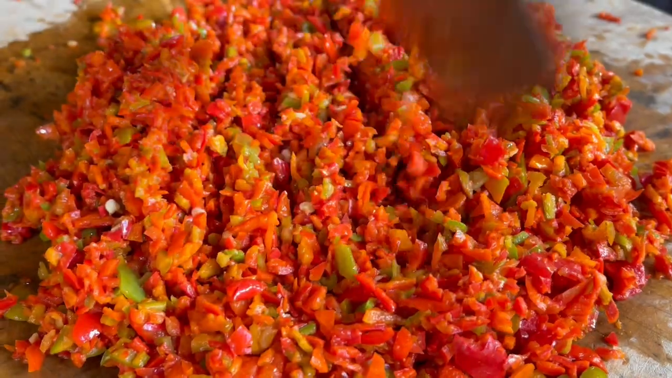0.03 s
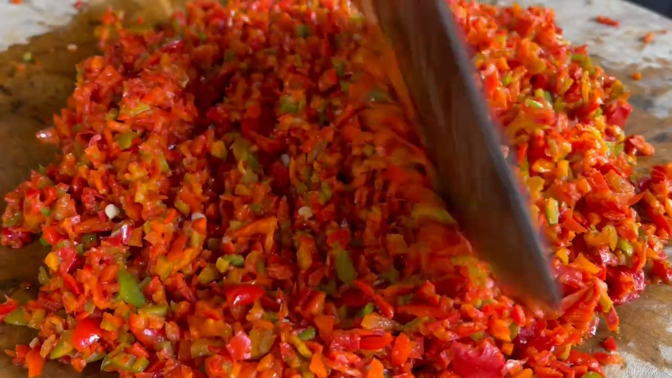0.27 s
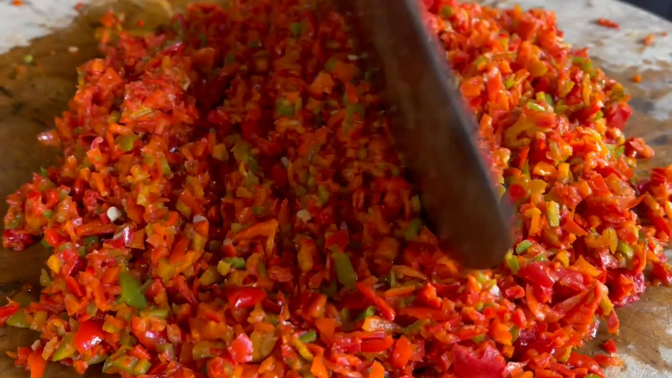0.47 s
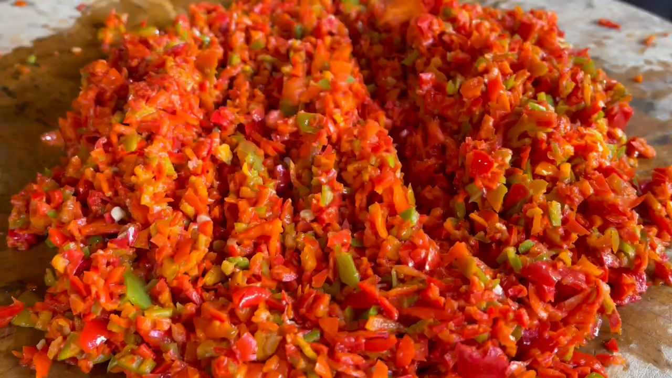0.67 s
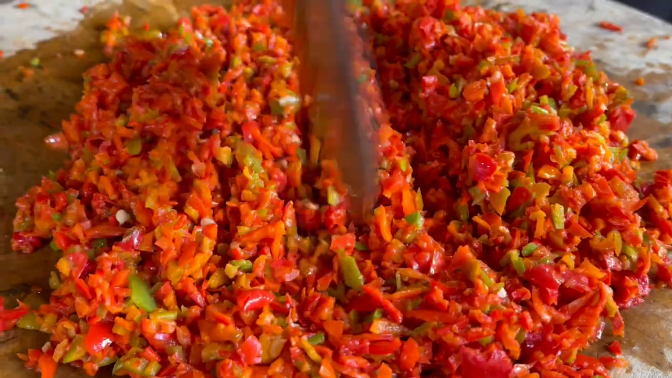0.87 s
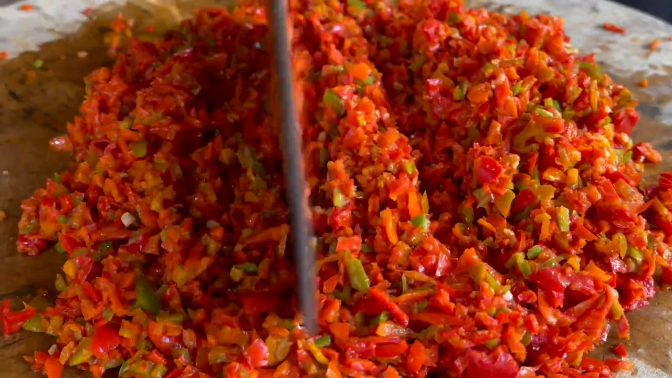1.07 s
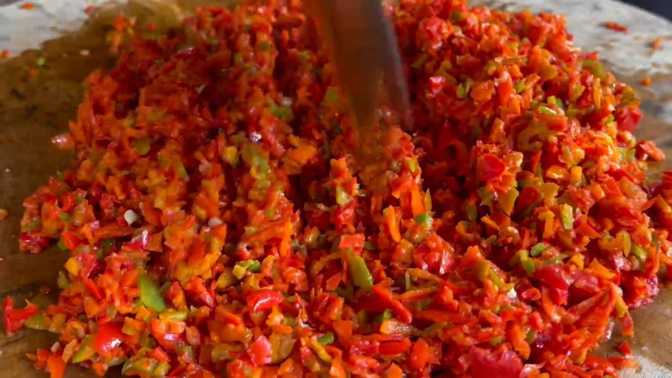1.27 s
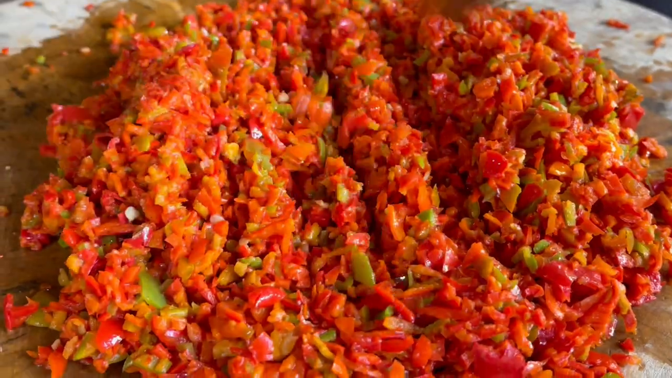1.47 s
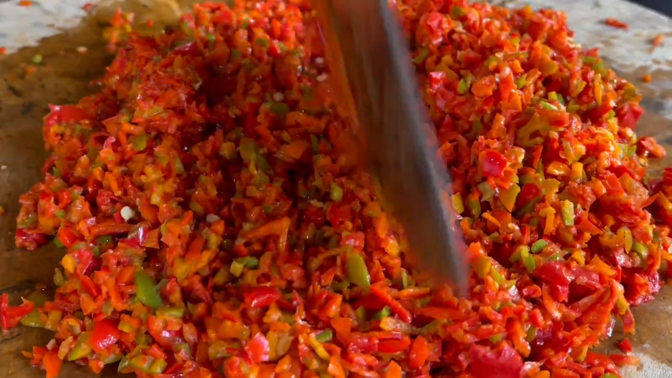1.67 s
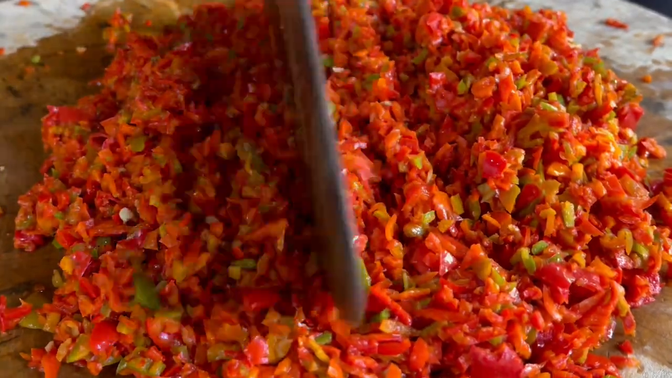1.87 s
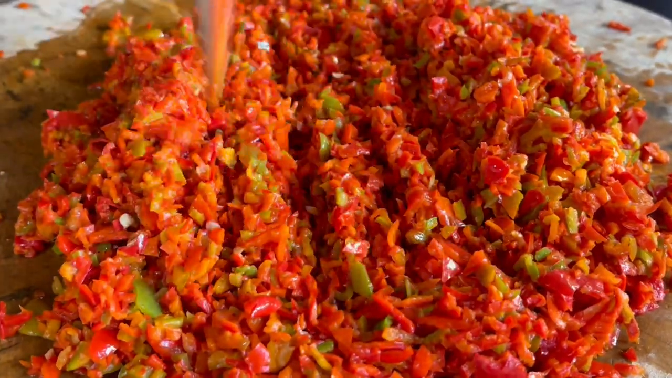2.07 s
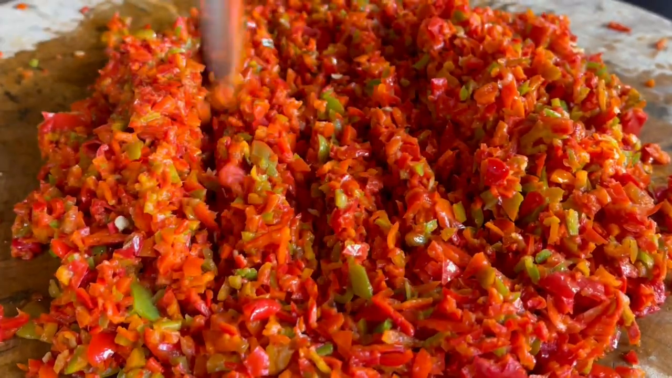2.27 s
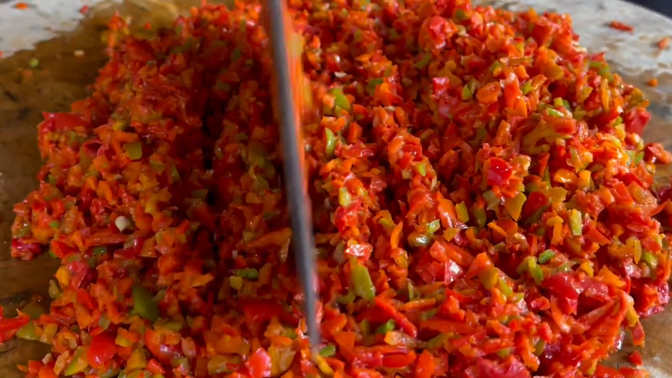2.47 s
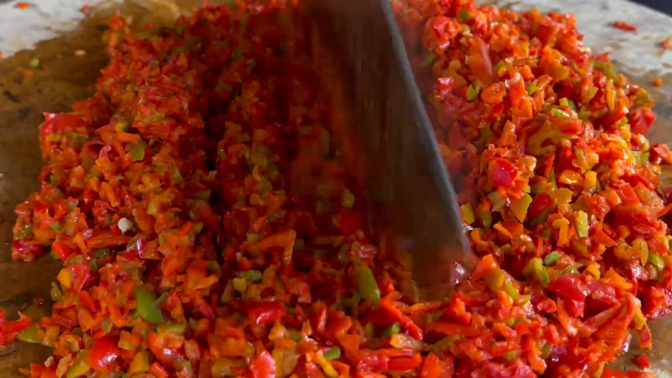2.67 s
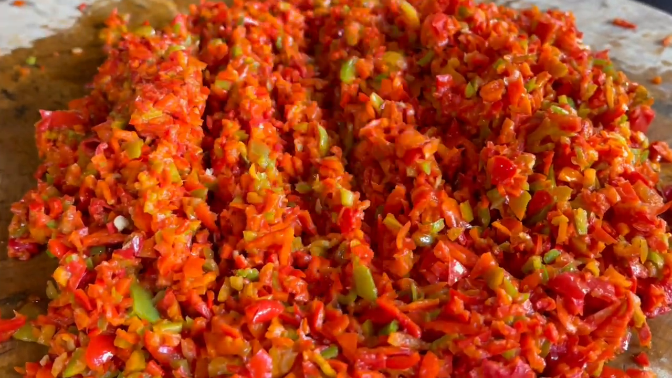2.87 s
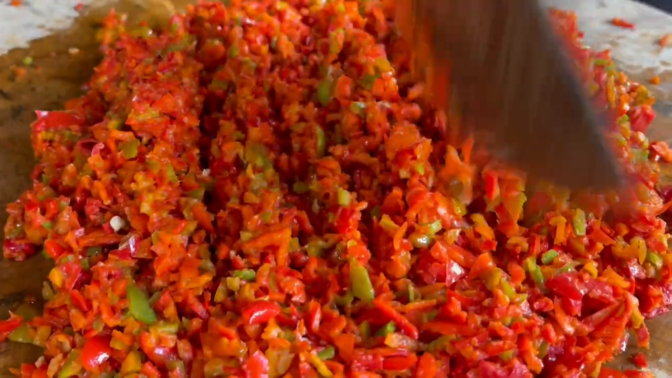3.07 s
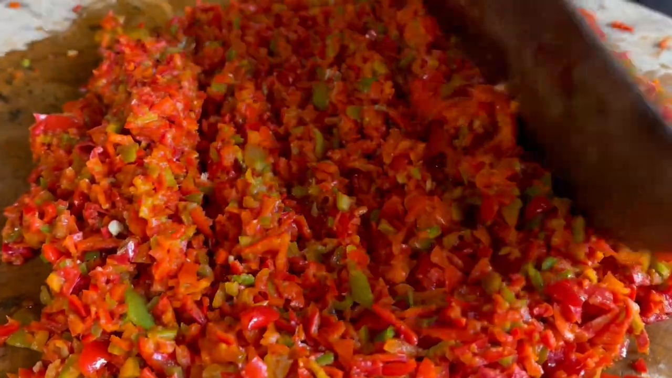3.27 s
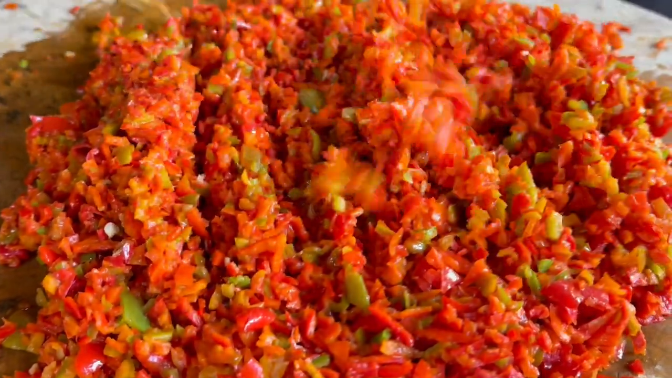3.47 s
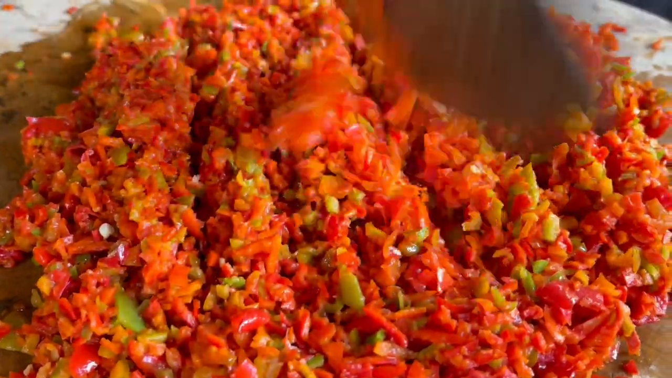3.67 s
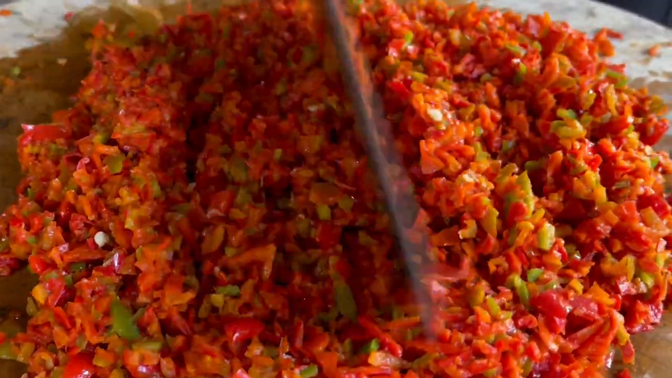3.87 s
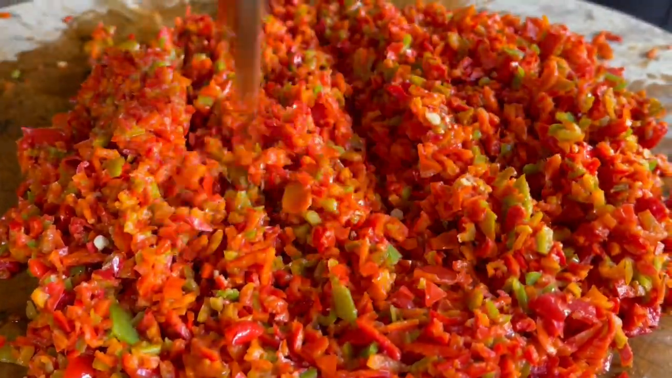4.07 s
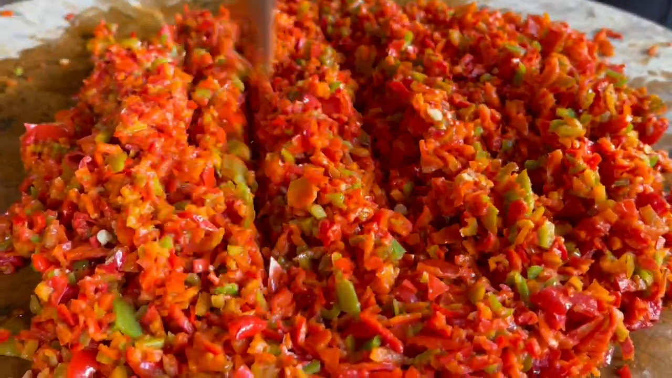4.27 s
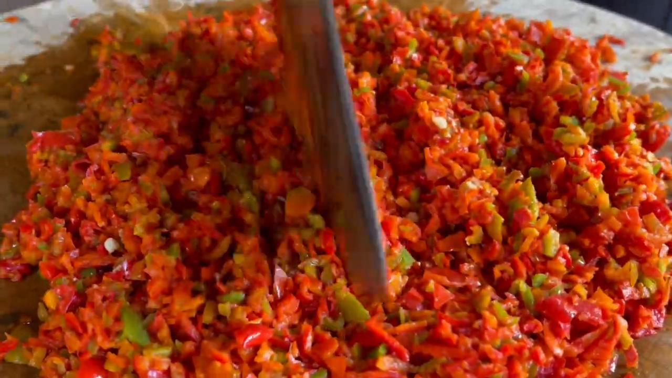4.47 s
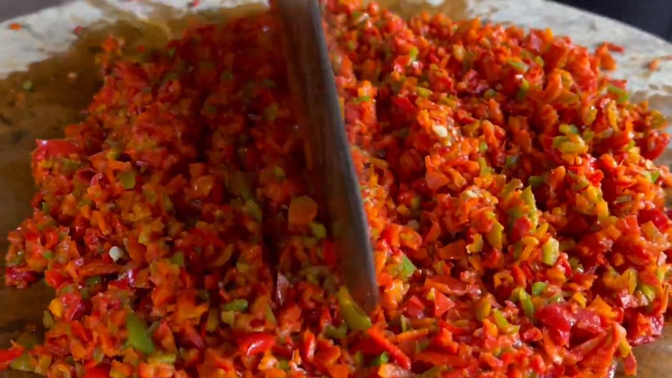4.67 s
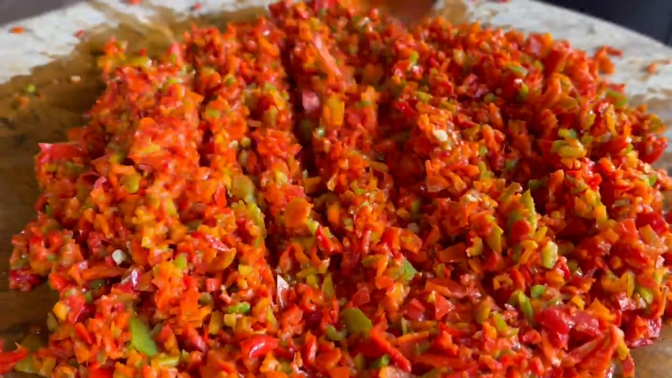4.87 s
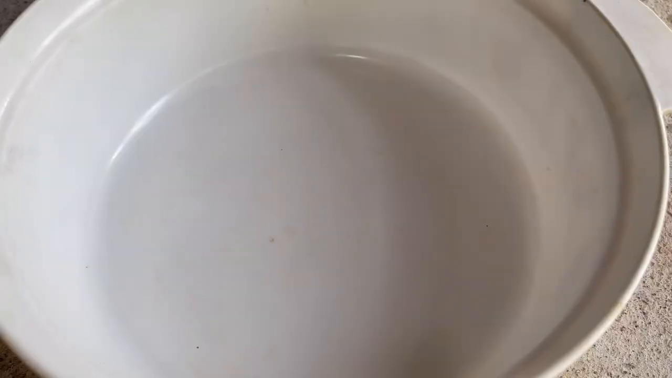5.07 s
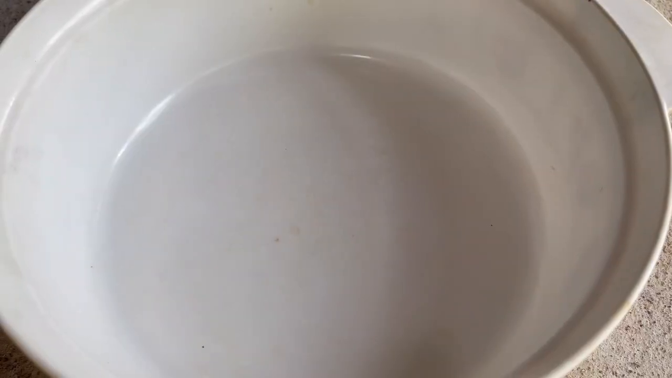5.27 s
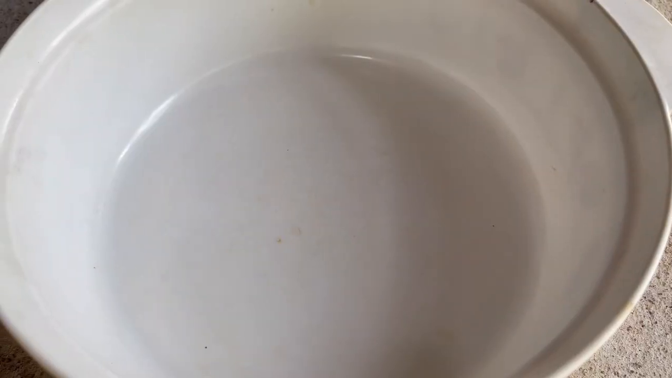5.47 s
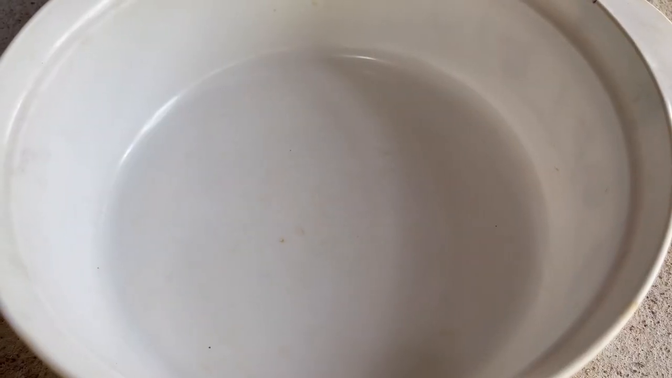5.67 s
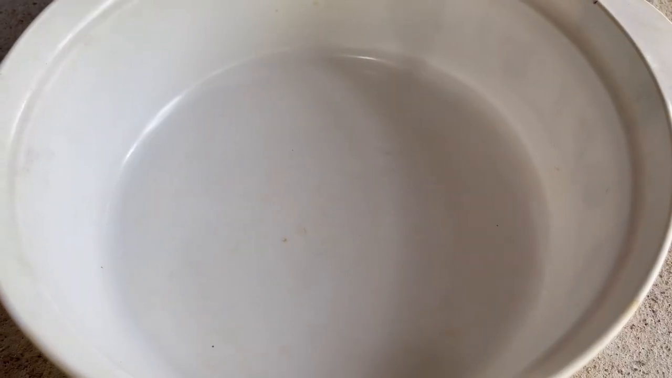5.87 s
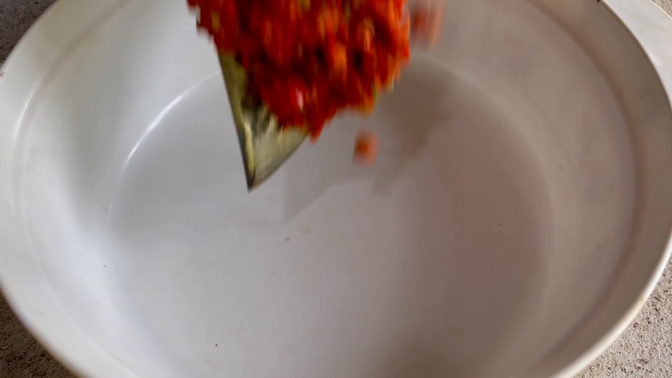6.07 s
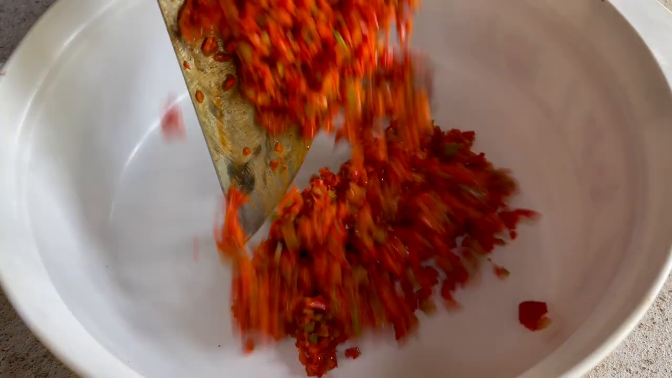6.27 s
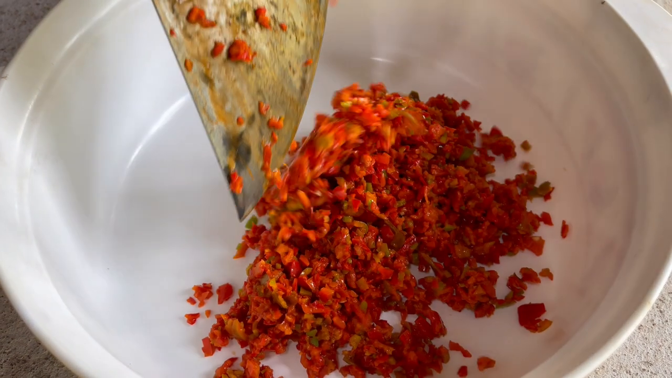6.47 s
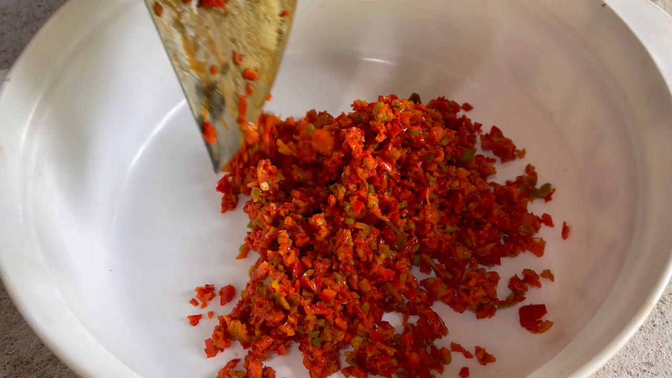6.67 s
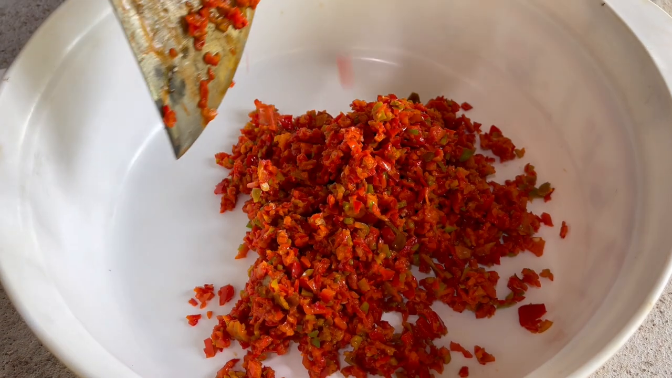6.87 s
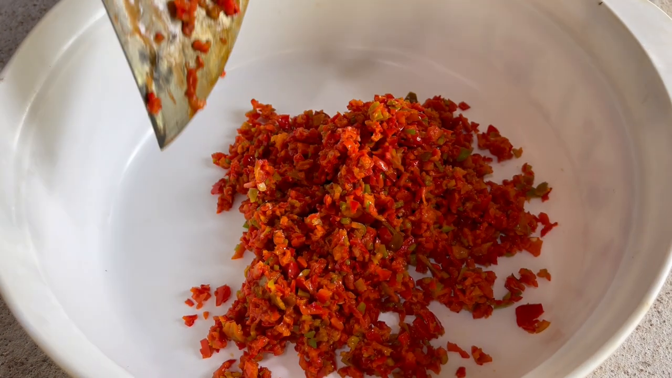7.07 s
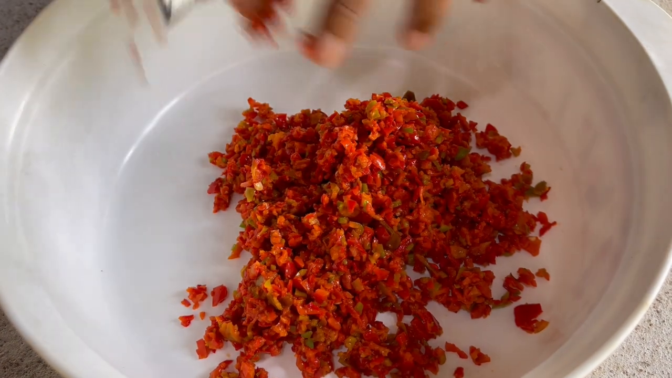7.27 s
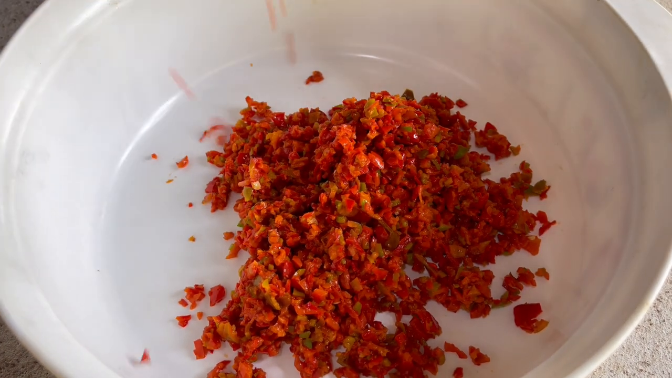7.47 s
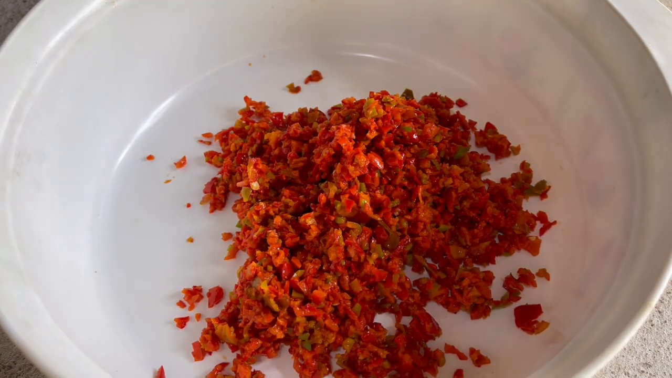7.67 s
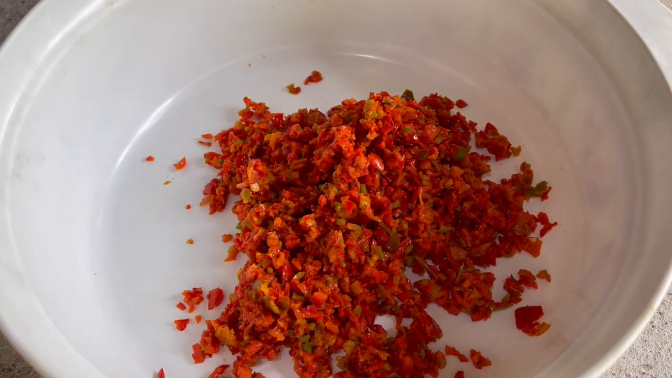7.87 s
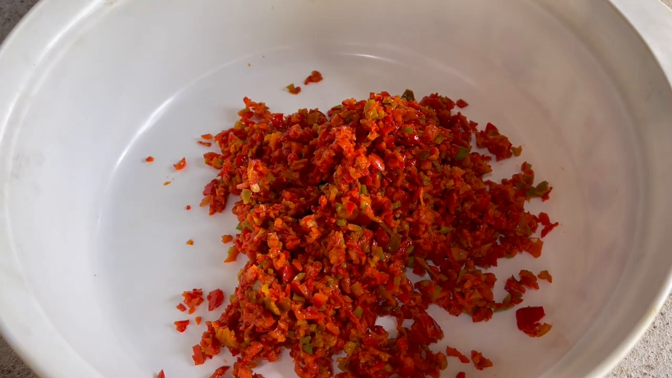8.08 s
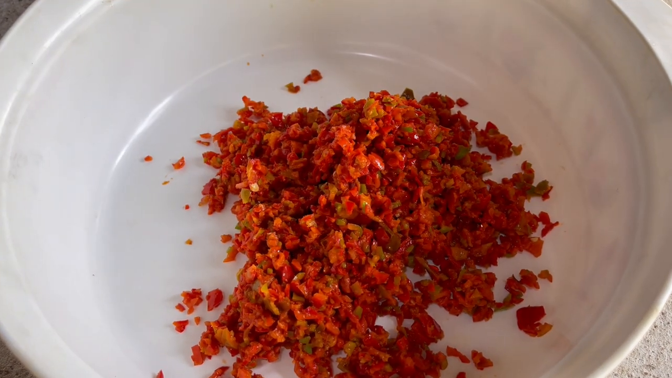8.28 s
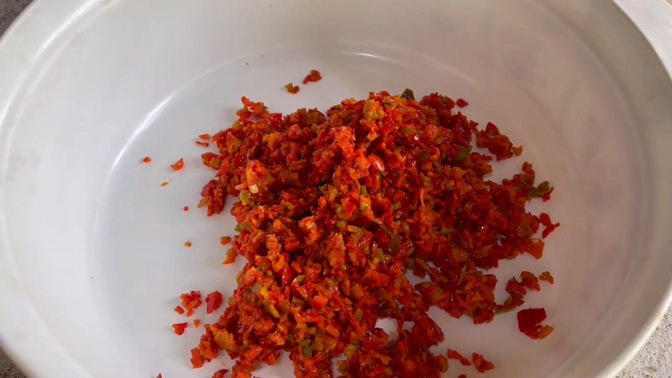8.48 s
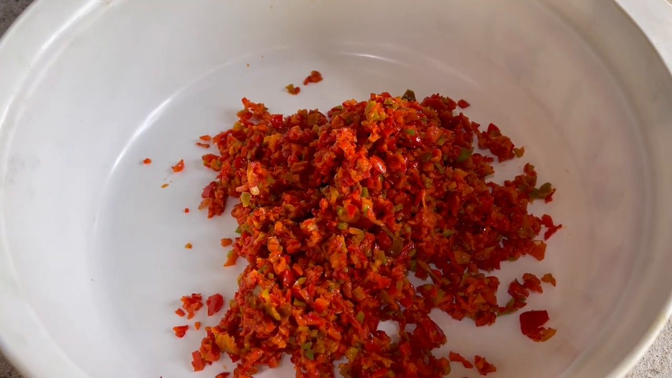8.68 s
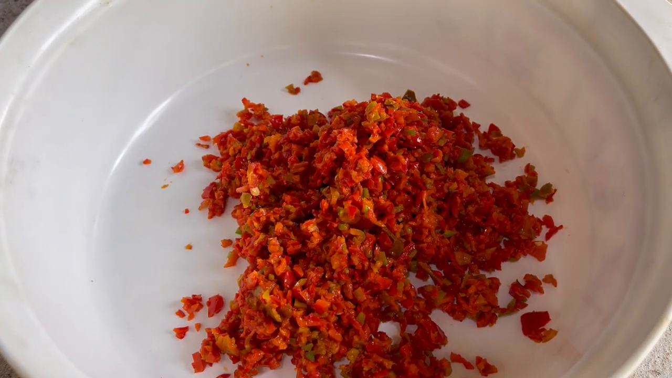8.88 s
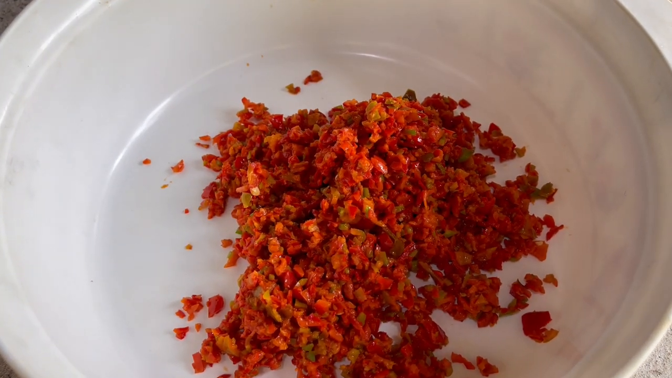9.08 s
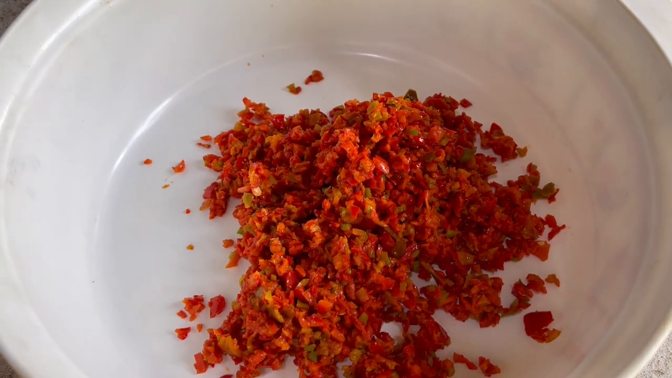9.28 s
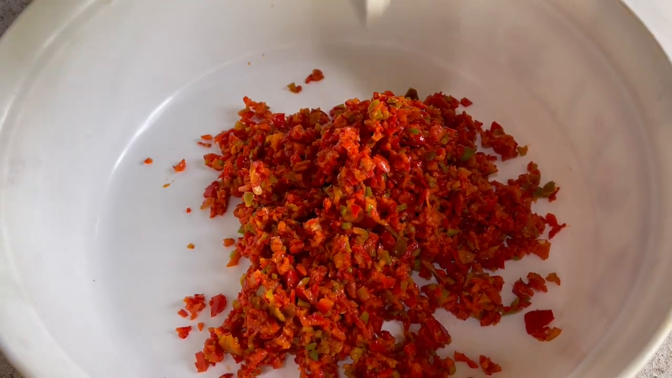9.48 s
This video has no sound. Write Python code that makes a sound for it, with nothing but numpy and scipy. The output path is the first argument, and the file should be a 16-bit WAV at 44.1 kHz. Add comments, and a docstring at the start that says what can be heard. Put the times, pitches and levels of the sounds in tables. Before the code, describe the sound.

A blade chops wet chilies steadily on a thick wooden block outdoors, then mince slides softly into a bowl and the blade scrapes wood, birds calling.

```python
"""Rhythmic chops on a thick wooden block outdoors: wet crunch of chilies, hollow knock, low thud of the stand.
After a brief dropout the mince slides off the blade into a bowl, a finger wipes the steel, the blade scrapes the block.
Birds call in the distance over a low rumble. Block, stand and steel are decaying sine modes; mince, rubbing and air
are coloured noise under envelopes; birds are wavering sine glides, with hiss on the chirps and diffuse echoes."""
import sys
import numpy as np
from scipy import signal
from scipy.fft import rfft, irfft, next_fast_len
from scipy.io import wavfile
from scipy.ndimage import uniform_filter1d

SR = 44100
rng = np.random.default_rng(int(sys.argv[2]) if len(sys.argv) > 2 else 0)


def digitize_waveform(pressure):
    """Quantize a signal to 16-bit integers and store it at the path in sys.argv[1].

    Rows of a 2-D input are taken as channels; values are limited to [-1, 1].
    """
    field = np.atleast_2d(pressure).T
    bounded = np.clip(field, -1, 1)
    quanta = np.round(bounded * 32767).astype(np.int16)
    wavfile.write(sys.argv[1], SR, quanta)


N = 420713
TIME = np.arange(N) / SR
DROPOUT_START_S, DROPOUT_END_S = 4.999, 5.042

# The chops. Each row: time in seconds, force in dB, pitch of the struck spot in Hz, then relative levels in dB of
# the block's clack, the edge tick, the crunch and the blade's ring.
CHOPS = [(-.045, -5, 780, -19, -35, -33, -48.5), (0.237, 1, 711, -16.5, -29.5, -30.5, -45),
         (0.513, -1, 624, -19, -30, -29, -45), (0.794, -1, 619, -16, -29, -33, -47.5),
         (1.066, -1, 676, -17, -32.5, -30, -47), (1.351, 0, 713, -17, -29, -35, -48),
         (1.633, -2, 961, -16, -29.5, -30.5, -54), (1.901, -1.5, 598, -16, -31.5, -33.5, -54.5),
         (2.171, -1.5, 592, -15.5, -33.5, -36.5, -66.5), (2.453, 0, 643, -15.5, -31.5, -37, -50),
         (2.731, -1.5, 611, -17, -29.5, -29.5, -43), (3.01, -1, 603, -18, -23.5, -33, -41.5),
         (3.308, -0.5, 724, -22, -26, -31, -40), (3.596, -0.5, 673, -17.5, -25.5, -33.5, -55.5),
         (3.882, -2, 711, -19.5, -23.5, -31.5, -54), (4.162, -1, 592, -13.5, -26.5, -34, -49),
         (4.441, -1.5, 627, -16.5, -26, -35.5, -50), (4.731, -2, 627, -14.5, -31.5, -32.5, -51)]
# Low modes of the block, its knock. Each row: frequency in Hz, relative level in dB, t60 in seconds.
KNOCK_MODES = [(352, -9, 0.05), (415, -13.5, 0.014), (496.6, -4.5, .055), (606, -1, 0.043),
               (655, -0.5, 0.033), (700.3, -1.5, 0.047), (759, 1, 0.034), (855, -5, 0.083), (951, -4, .05)]
# High modes of the block, its clack. Each row: frequency in Hz, relative level in dB, t60 in seconds.
CLACK_MODES = [(1146, -3.5, .045), (1218, 4.5, 0.032), (1316, 2, 0.031), (1412, -6.5, 0.038),
               (1506, -8, .045), (1716, -6.5, 0.031), (2095, -8.5, 0.031), (2160, -10, 0.056),
               (2386, -17.5, 0.056), (2420, -16, 0.018), (3450, -15, 0.036)]
# Colour of the wet crunch, also lent to the edge catching. Each row: frequency in Hz, relative density in dB per Hz.
CRUNCH_COLOUR = [(300, -7.5), (900, -1.5), (1500, -14.5), (3000, -8.5), (6500, -13), (9000, -0.5),
                 (10200, -7), (11200, -2.5), (13000, -42.5)]
# Left-right likeness of near sounds. Each row: frequency in Hz, correlation from -1 to 1.
NEAR = [(60, .99), (200, 0.83), (700, 0.67), (2000, .94), (7000, .88), (8800, 0.26), (9800, -.6),
        (11000, -.4), (12000, 0.24)]
# Left-right likeness of diffuse sounds. Each row: frequency in Hz, correlation from -1 to 1.
WIDE = [(60, .99), (250, .92), (600, 0.57), (1300, .1), (2700, 0.11), (6000, 0.52), (8700, 0.77),
        (9800, -0.085), (11000, -0.62), (12000, -0.2)]


def from_db(db):
    """Decibels to amplitude gain."""
    return 10 ** (np.asarray(db) / 20)


def rms_one(x):
    """Scale to unit power."""
    return x / np.sqrt(np.mean(x ** 2) + 1e-20)


def at_hz(points, hz):
    """Read a table on a log-frequency axis."""
    points = np.array(points)
    return np.interp(np.log(hz + 1e-3), np.log(points[:, 0]), points[:, 1])


def add(out, s, sound):
    """Mix a sound in from time s, trimming what falls outside."""
    i = int(round(s * SR))
    part = sound[..., max(-i, 0):N - i]
    out[..., max(i, 0):max(i, 0) + part.shape[-1]] += part


def noise(colour, likeness, grain_db=0):
    """Stereo noise of a given colour, rms 1; a larger grain_db breaks it into separate tiny clicks."""
    size = next_fast_len(N)
    hz = np.arange(size // 2 + 1) * SR / size
    grain_levels = grain_db * np.minimum(rng.exponential(1, size), 7)
    grains = rng.standard_normal((2, size)) * from_db(grain_levels)
    # Roll off smoothly outside the table's range.
    low_skirt = 1 + (.7 * colour[0][0] / (hz + 1)) ** 4
    high_skirt = 1 + (hz / (1.3 * colour[-1][0])) ** 6
    mid, side = rfft(grains) * from_db(at_hz(colour, hz)) / low_skirt / high_skirt
    alike = np.clip(at_hz(likeness, hz), -1, 1)
    stereo = np.sqrt(1 + alike) * mid + np.sqrt(1 - alike) * side * [[1], [-1]]
    return rms_one(irfft(stereo, size)[:, :N])


def bursts(times, levels_db, rise_s, t60):
    """Envelope swelling at 60 dB per rise_s for the last 60 ms before each moment, then dying away."""
    out, lead = np.zeros(N), .06
    t = np.arange(int((lead + 1.5 * t60) * SR)) / SR - lead
    shape = from_db(-60 * np.maximum(-t / rise_s, t / t60))
    for s, db in zip(times, levels_db):
        add(out, s - lead, from_db(db) * shape)
    return out


def stroke(s, attack, hold, release):
    """Gain of one hand movement: swells 30 dB over the attack up to time s, holds, fades 30 dB per release."""
    away = np.maximum((s - TIME) / attack, (TIME - s - hold) / release)
    return from_db(-30 * np.clip(away, 0, 5))


def lumps(rate_hz, depth_db):
    """A gain that stumbles at random as pieces stick and let go; rms 1."""
    knots = np.cumsum(rng.exponential(1, 4000)) / rate_hz
    heights = np.clip(rng.standard_normal(len(knots)), -2, 2)
    return rms_one(from_db(depth_db * np.interp(TIME, knots, heights)))


def struck(modes, spread_db, detune):
    """One blow, rms 1 over its first 30 ms: the contact point shifts each mode's strength and pitch."""
    # How a struck body reaches the two ears. Each row: frequency in Hz, left-right level in dB, right ear lag in ms.
    ears = [(150, 1.3, 0), (200, -2.5, -.1), (245, 4, -0.28), (345, -3.5, -0.53), (415, 2.5, -.3),
            (472, 3, -0.082), (590, 2, .1), (640, 1, .13), (706, 3.5, 0.22), (785, 1, -.2), (865, -2, -.1),
            (965, 0, .08), (1125, 2.5, -.08), (1450, 4, -.02), (2096, 0.5, -.01), (3480, 0.5, .03)]
    hz, db, t60 = np.array(modes).T[:, :, None]
    ear_hz, ear_db, ear_ms = np.transpose(ears)
    pan_db = np.interp(hz, ear_hz, ear_db)
    lag_ms = np.interp(hz, ear_hz, ear_ms)
    strength, pitch = rng.standard_normal((2, len(hz), 1))
    side = np.array([1, -1])[:, None, None]  # left, right
    t = np.maximum(np.arange(SR // 5) / SR + side * lag_ms / 2000, 0)  # half the lag per ear
    gain = from_db(db + spread_db * strength + side * pan_db / 2 - 60 * t / t60)
    blow = np.sum(gain * np.sin(2 * np.pi * hz * (1 + detune * pitch) * t), axis=1)
    return blow / np.sqrt(np.mean(blow[:, :int(.03 * SR)] ** 2))


def seated(blow, seat_s):
    """The force builds up while the edge seats itself along its length."""
    return blow * (1 - np.exp(-np.arange(blow.shape[1]) / SR / seat_s))


def high_pass(x, edge_hz):
    """Small bodies radiate little bass."""
    return signal.sosfilt(signal.butter(2, edge_hz, "high", fs=SR, output="sos"), x + 1e-18)


def distant(x, t60, wet_db):
    """A far sound with diffuse echoes from walls and trees, as decaying noise."""
    t = np.arange(int(t60 * SR)) / SR
    echoes = rng.standard_normal((2, len(t))) * from_db(-60 * t / t60)
    echoes /= np.sqrt(np.sum(echoes ** 2, axis=1, keepdims=True))
    return x + from_db(wet_db) * signal.fftconvolve(x[None], echoes, axes=1)[:, :N]


def warble(hz, depth, rate_hz):
    """A whistle on the given pitch track with a quick random waver."""
    waver = np.interp(np.arange(len(hz)) / SR * rate_hz, np.arange(400), rng.standard_normal(400))
    return np.sin(2 * np.pi * np.cumsum(hz * (1 + depth * waver)) / SR)


def knocks(thud_delay=.0055, contact_delay=.0011):
    """The edge meets the block, the block pushes its stand a moment later, and the steel rings faintly."""
    # Modes of the stand, the thud. Each row: frequency in Hz, relative level in dB, t60 in seconds.
    stand_modes = [(58, -11.5, 0.21), (121, -2, 0.071), (148, 2.5, 0.093), (194, -6, 0.084),
                   (243.2, -5.5, 0.079)]
    # Modes of the freely ringing blade. Each row: frequency in Hz, relative level in dB, t60 in seconds.
    blade_modes = [(2680, -4, 0.33), (3880, -6, 0.3), (5885, -9, 0.2), (8700, -7, 0.063)]
    knock_trim_db, clack_trim_db, thud_trim_db, ring_trim_db = -6.5, -3.5, -15, 2
    spot_lift_db, spot_width_octaves = 4.5, .19  # modes near the struck spot's pitch stand out
    centre_hz, thud_loss_db_per_octave = 620, 8.0  # the thud weakens toward the higher-pitched rim
    block, stand, blade = np.zeros((3, 2, N))
    t = np.arange(SR // 2) / SR
    for s, force_db, spot_hz, clack_db, _, _, ring_db in CHOPS:
        favoured = []
        for hz, db, t60 in KNOCK_MODES:
            octaves_off = np.log2(hz / spot_hz)
            lift_db = spot_lift_db * np.exp(-(octaves_off / spot_width_octaves) ** 2)
            favoured.append((hz, db + lift_db, t60))
        knock = struck(favoured, spread_db=1.8, detune=.015)
        clack = struck(CLACK_MODES, spread_db=2.5, detune=.02)
        thud = struck(stand_modes, spread_db=.6, detune=.008)
        thud_db = force_db + thud_trim_db - thud_loss_db_per_octave * np.log2(spot_hz / centre_hz)
        add(block, s + contact_delay, -from_db(force_db + knock_trim_db) * seated(knock, seat_s=.001))
        add(block, s + contact_delay, -from_db(clack_db + clack_trim_db) * seated(clack, seat_s=.00059))
        add(stand, s + thud_delay, from_db(thud_db) * thud)
        for hz, db, t60 in blade_modes:
            contact_db = 1.5 * rng.standard_normal()
            decay = from_db(ring_trim_db + ring_db + db + contact_db - 60 * t / t60)
            add(blade, s, decay * np.sin(2 * np.pi * hz * t))
    return high_pass(block, edge_hz=400) + high_pass(stand, edge_hz=87) + blade


def cuts(echo_delay=.0105):
    """Chili skins crunch and load the wood until the edge ticks on it; nearby surfaces and the yard answer."""
    # Wood groaning under the squeezed chilies. Each row: frequency in Hz, relative density in dB per Hz.
    press_colour = [(600, -20.5), (800, -5), (950, 1), (1100, -8.5), (1400, -20)]
    # Edge tick. Each row: frequency in Hz, relative density in dB per Hz.
    tick_colour = [(800, -10.5), (2000, 12.5), (3000, -2.5), (4500, 2), (7000, -9.5), (9000, -3),
                   (10200, -12.5), (11200, -16.5), (13000, -25)]
    # Answer of nearby surfaces. Each row: frequency in Hz, relative density in dB per Hz.
    scatter_colour = [(150, 1), (600, 10.5), (1000, 5), (1500, -10.5), (2300, -2), (3100, -21.5),
                      (4600, -15.5), (7000, -23), (9000, -22.5), (10200, -29), (11200, -27), (13000, -51)]
    # Answer of the yard. Each row: frequency in Hz, relative density in dB per Hz.
    yard_colour = [(150, 6.5), (550, 3), (900, -1.5), (1400, -4.5), (2500, -11.5), (3800, -20), (6500, -24),
                   (9000, -13), (13000, -33)]
    s, force_db, _, _, tick_db, crunch_db, _ = np.transpose(CHOPS)
    crunch = from_db(7.5) * bursts(s - .0005, crunch_db, rise_s=.023, t60=.006)
    crunch = crunch * noise(CRUNCH_COLOUR, NEAR, grain_db=3.5) * lumps(500, depth_db=6.0)
    press = from_db(1.9) * bursts(s - .002, crunch_db, rise_s=.027, t60=.033) * noise(press_colour, NEAR)
    direct = from_db(10.0) * bursts(s + .0015, tick_db, rise_s=.004, t60=.017)
    echo = from_db(-10.0) * bursts(s + echo_delay, tick_db, rise_s=.006, t60=.1)
    ticks = (direct + echo) * noise(tick_colour, NEAR, grain_db=5.0)
    scatter = from_db(-23.0) * bursts(s + .014, force_db, rise_s=.03, t60=.13)
    scatter = scatter * noise(scatter_colour, NEAR, grain_db=2.5)
    yard = from_db(-47.5) * bursts(s + .03, force_db, rise_s=.03, t60=.47) * noise(yard_colour, WIDE)
    return crunch + press + ticks + scatter + yard


def lifts():
    """Wet pieces rustle off the blade as it rises out of the deep mince: grainy noise in soft swells."""
    # The lifts. Each row: time in seconds, level in dB.
    lift_moments = [(0.019, -57.5), (.13, -61.5), (.39, -57.5), (.67, -60.5)]
    # Rustle. Each row: frequency in Hz, relative density in dB per Hz.
    rustle_colour = [(1800, -8), (2800, 0.5), (4300, -3), (5500, -17)]
    swells = bursts(*np.transpose(lift_moments), rise_s=.16, t60=.35)
    return swells * noise(rustle_colour, WIDE, grain_db=2.5)


def bowl():
    """Wet mince slides off the steel and lands in soft clumps; a finger wipes off the rest."""
    # Clumps landing in the bowl. Each row: time in seconds, relative levels in dB of plop and splash.
    clumps = [(6.168, -35.5, -44), (6.18, -48, -45), (6.226, -34.5, -58), (6.255, -45, -56),
              (6.309, -61, -42), (6.342, -35, -34), (6.361, -76, -47), (6.405, -48.5, -44),
              (6.627, -48.5, -40), (6.758, -47.5, -46), (7.393, -53, -52), (7.416, -41.5, -40),
              (7.437, -55, -40), (7.525, -50, -48)]
    # Dull body of a landing. Each row: frequency in Hz, relative density in dB per Hz.
    plop_colour = [(150, -7), (230, 5), (400, -6), (800, 2), (1300, 5), (1900, 1), (3000, -49), (6000, -35)]
    # Bright wet part of a landing. Each row: frequency in Hz, relative density in dB per Hz.
    splash_colour = [(1000, -17), (2500, 12.5), (5000, 4.5), (7000, 1.5), (9000, 4), (11000, -3),
                     (13000, -26)]
    # The mince creeps down the blade, then the whole load lets go.
    # Each row: time at full strength, attack, hold and release in seconds, relative level in dB.
    slide_moves = [(6.16, 0.89, .12, 1, -53.5), (6.245, 0.062, 0.021, 0.12, -38)]
    # Sliding mince. Each row: frequency in Hz, relative density in dB per Hz.
    slide_colour = [(110, -35.5), (180, -0.5), (215, -2.5), (424, -12), (596, -1), (700, -21), (1180, 1),
                    (1310, -13), (2160, -13), (2400, -9.5), (5870, -18.5), (8860, -30), (12900, -40),
                    (16800, -56.5), (22000, -120)]
    # Wet strokes along the steel.
    # Each row: time at full strength, attack, hold and release in seconds, relative level in dB.
    wipe_moves = [(5.663, .06, 0.023, 0.32, -75.5), (6.105, 0.28, 0.045, 0.12, -60),
                  (6.252, 0.085, 0.035, .16, -46), (6.363, .04, .05, 0.27, -58.5),
                  (6.766, 0.44, 0.014, 0.1, -49), (7.178, 0.17, 0.066, 0.17, -48.5),
                  (7.333, 0.23, .04, 0.99, -67.5)]
    # Wiped steel. Each row: frequency in Hz, relative density in dB per Hz.
    wipe_colour = [(1470, -18), (2500, -21), (2810, -18), (3030, -26), (3340, -23.5), (5500, -15.5),
                   (7550, -10.5), (9150, 1.5), (10200, -10.5), (11500, -3.5), (12900, -33), (16800, -55),
                   (22000, -120)]
    s, plop_db, splash_db = np.transpose(clumps)
    plops = from_db(.5) * bursts(s + .001, plop_db, rise_s=.0081, t60=.14)
    plops = plops * noise(plop_colour, WIDE, grain_db=.5) * lumps(220, depth_db=3.0)
    splashes = from_db(.5) * bursts(s + .001, splash_db, rise_s=.008, t60=.061)
    splashes = splashes * noise(splash_colour, WIDE, grain_db=5.0)
    sliding = sum(from_db(db) * stroke(*timing) for *timing, db in slide_moves)
    wiping = sum(from_db(db) * stroke(*timing) for *timing, db in wipe_moves)
    slide = from_db(-.5) * sliding * noise(slide_colour, WIDE, grain_db=2.5) * lumps(150, depth_db=1.5)
    wipe = from_db(4.5) * wiping * noise(wipe_colour, WIDE, grain_db=3.5) * lumps(180, depth_db=4.0)
    lean_left = from_db([[1.3], [-1.3]])
    return (plops + splashes + slide) * lean_left + wipe


def scrape():
    """The blade gathers the next load: slips rasp block and steel, wet pieces hiss, the edge catches at times."""
    # Pushes across the block. Each row: time at full strength, attack, hold and release in seconds,
    # relative levels in dB of wood and hiss.
    pushes = [(7.83, 0.026, 0.28, .2, -66, -63), (8.044, 0.086, 0.12, 0.54, -47.5, -51),
              (8.481, 0.2, 0.063, 0.12, -50, -43), (8.76, 0.21, 0.015, .3, -61.5, -87)]
    # Rubbed wood. Each row: frequency in Hz, relative density in dB per Hz.
    rub_colour = [(76, -27), (130, -1), (227, -0.5), (330, -24), (638, -9), (792, -16), (850, -8),
                  (1200, -36), (1380, -14), (3520, -65), (4000, -34), (5200, -57), (8800, -120)]
    # Hiss of wet pieces. Each row: frequency in Hz, relative density in dB per Hz.
    hiss_colour = [(880, -37), (1500, -14.5), (1760, -5), (2350, -5), (2670, -7), (3170, -8), (4260, -11.5),
                   (5100, -4), (6990, -7.5), (8520, 3), (10300, -10), (11600, -7), (12900, -34),
                   (16800, -59), (22000, -120)]
    # Modes of the blade pressed on the wood. Each row: frequency in Hz, relative level in dB, t60 in seconds.
    pressed_blade = [(859, -5, 0.071), (1050, -2, 0.089), (1413, -6, 0.12), (2060, 3, .045),
                     (2365, 4, 0.053), (3150, -3, .07), (4040, -8, 0.092), (7600, -3, .04), (9230, 1, .025)]
    # Sharp ticks as the edge or wet pieces touch and let go. Each row: time in seconds, level in dB.
    catch_moments = [(5.205, -59), (5.23, -63), (7.917, -56), (8.033, -36.5), (8.199, -39), (8.727, -57.5),
                     (8.851, -61), (8.999, -63)]
    slips = rng.standard_normal((1, N))
    block = struck(KNOCK_MODES + CLACK_MODES, spread_db=5, detune=.012)
    blade = struck(pressed_blade, spread_db=1, detune=.003)
    rasp = rms_one(signal.fftconvolve(slips, block, axes=1)[:, :N])
    steel = rms_one(signal.fftconvolve(slips, blade, axes=1)[:, :N])
    rub = noise(rub_colour, WIDE, grain_db=2.0)
    wet = noise(hiss_colour, WIDE, grain_db=2.5)
    pressing = sum(from_db(wood_db) * stroke(*timing) for *timing, wood_db, _ in pushes)
    sweeping = sum(from_db(hiss_db) * stroke(*timing) for *timing, _, hiss_db in pushes)
    wood = pressing * (from_db(2.5) * rub + from_db(-12) * rasp)
    hiss = sweeping * (from_db(.5) * wet + from_db(-9) * steel)
    catches = bursts(*np.transpose(catch_moments), rise_s=.004, t60=.032)
    catches = catches * noise(CRUNCH_COLOUR, WIDE, grain_db=-.5)
    return (wood + hiss) * lumps(160, depth_db=2.0) + catches


def handling():
    """Dull little bumps as things are moved about: short swells of low noise."""
    # The bumps. Each row: time in seconds, level in dB.
    bump_moments = [(4.876, -52.5), (5.612, -54), (5.678, -52.5), (5.761, -50.5), (5.98, -66),
                    (9.14, -57.5)]
    # Bump. Each row: frequency in Hz, relative density in dB per Hz.
    bump_colour = [(200, -5), (380, -6.5), (540, -1), (700, -11), (1000, -14), (3000, -25)]
    return bursts(*np.transpose(bump_moments), rise_s=.027, t60=.23) * noise(bump_colour, WIDE)


def chirper():
    """A small bird repeats a husky chirp whose pitch drops steeply, then levels off as it fades."""
    # The chirps. Each row: time in seconds, relative level in dB.
    chirp_moments = [(0.246, -60), (0.774, -65.5), (1.042, -54), (1.303, -54), (1.57, -52), (1.816, -52.5),
                     (2.089, -52.5), (2.36, -52.5), (2.603, -52.5), (2.865, -51.5), (3.129, -51.5),
                     (3.38, -52), (3.663, -52), (3.925, -55), (4.184, -49.5), (4.70, -55), (4.976, -57),
                     (5.06, -65.5), (5.52, -70)]
    # Airy hiss around a chirp's start. Each row: frequency in Hz, relative density in dB per Hz.
    husk_colour = [(2700, -7), (3600, 1.5), (5300, -3), (6000, -22.5)]
    top_hz, end_hz, half_fall_s = 5300, 1850, .017  # the glide nears end_hz; half of the drop takes half_fall_s
    length_s, attack_s, fade_db_per_s = .17, .0097, 210.5
    chirps = np.zeros(N)
    t = np.arange(int(length_s * SR)) / SR
    glide_hz = end_hz + (top_hz - end_hz) / (1 + t / half_fall_s)
    ramps = np.minimum(np.minimum(t, length_s - t) / attack_s, 1)
    shape = ramps * from_db(-fade_db_per_s * t)
    for s, db in chirp_moments:
        add(chirps, s, from_db(db) * shape * warble(glide_hz, depth=.035, rate_hz=1200))
    s, db = np.transpose(chirp_moments)
    husk = from_db(-8) * bursts(s + .014, db, rise_s=.03, t60=.25) * noise(husk_colour, WIDE)
    return from_db(-.2) * distant(chirps, t60=.36, wet_db=1.5) + husk


def whistlers(count=20):
    """Another bird warbles short slurs from farther off, with others slurring down at random behind it."""
    # The nearer whistler. Each row: start and length in seconds, start and end pitch in Hz, relative level in dB.
    whistle_notes = [(5.768, 0.064, 1684, 1690, -60), (5.907, 0.1, 1317, 1237, -57),
                     (6.549, 0.062, 2055, 1915, -66), (6.74, 0.14, 1890, 1466, -64),
                     (6.951, 0.041, 1976, 2080, -57), (7.076, 0.072, 1273, 1435, -63.5),
                     (7.117, 0.058, 1774, 1640, -57), (7.233, 0.085, 1570, 1397, -63),
                     (7.502, 0.059, 1985, 1766, -57.5), (7.602, 0.086, 1627, 1440, -63.5),
                     (7.715, 0.049, 2123, 1960, -56.5), (7.787, 0.077, 1485, 1344, -62.5),
                     (7.868, 0.15, 1823, 1687, -63), (8.285, 0.091, 1700, 1590, -62),
                     (8.581, 0.076, 1730, 1637, -60), (8.715, 0.18, 1695, 1397, -74),
                     (8.943, 0.064, 1930, 2000, -68)]
    flock_span_s, flock_pitch_hz = (5.7, 9.0), (1370, 2095)
    flock_note_s, flock_fall, flock_db = .11, .098, -65.5  # the fall is a fraction of the pitch
    whistles = np.zeros(N)
    low, high = np.transpose([flock_span_s, flock_pitch_hz])
    flock = [(s, flock_note_s, hz, hz * (1 - flock_fall), flock_db)
             for s, hz in rng.uniform(low, high, (count, 2))]
    for s, length, start_hz, end_hz, db in whistle_notes + flock:
        slur_hz = np.linspace(start_hz, end_hz, int(length * SR))
        note = warble(slur_hz, depth=.045, rate_hz=240)
        add(whistles, s, from_db(db) * signal.windows.tukey(len(note), .5) * note)
    return from_db(-1.9) * distant(whistles, t60=.53, wet_db=7.5)


def outdoors():
    """Low rumble and faint air as noise, different at block and bowl, where the rumble swells and sinks."""
    # Air at the block. Each row: frequency in Hz, relative density in dB per Hz.
    block_colour = [(15, -30.5), (25, 2), (90, 3.5), (219, -22.5), (420, -28), (546, -20), (655, -30),
                    (787, -15), (1400, -37), (2420, -32), (3770, -35), (6530, -44.5), (8940, -42),
                    (11300, -48), (12900, -73), (16800, -107), (22000, -120)]
    # Air at the bowl. Each row: frequency in Hz, relative density in dB per Hz.
    bowl_colour = [(15, -62), (25, -23), (48, -2), (97, 0), (173, -15), (219, -28), (350, -30.5),
                   (600, -29), (1080, -34), (1300, -37), (2050, -42.5), (2980, -42.5), (4080, -50),
                   (4780, -36.5), (5590, -59.5), (9180, -47), (12900, -56), (16800, -94), (22000, -120)]
    # Swell of the rumble at the bowl. Each row: time in seconds, gain in dB.
    swell_points = [(5.04, 2), (5.6, 4.5), (6.1, -4), (6.9, -1), (7.7, -3), (8.2, 2), (8.7, -0.5),
                    (9.54, -3.5)]
    at_block = from_db(-51.5) * noise(block_colour, NEAR)
    at_bowl = from_db(-49.5) * noise(bowl_colour, WIDE)
    rumble = signal.sosfiltfilt(signal.butter(2, 220, fs=SR, output="sos"), at_bowl)
    swell = from_db(np.interp(TIME, *np.transpose(swell_points)))
    return np.where(TIME < DROPOUT_START_S, at_block, at_bowl + (swell - 1) * rumble)


def scene():
    """All sources together, from the chops to the background."""
    chopping = knocks() + cuts() + lifts()
    gathering = bowl() + scrape() + handling()
    return chopping + gathering + chirper() + whistlers() + outdoors()


def record(dry):
    """Peaks are rounded toward full scale, the sound drops out for a moment, the top is cut."""
    rounded = dry / (1 + np.abs(dry) ** 4) ** (1 / 4)
    sounding = (TIME < DROPOUT_START_S) | (TIME > DROPOUT_END_S)
    live = uniform_filter1d(sounding.astype(float), size=64)  # soften the edges of the gap
    top_cut = signal.ellip(8, .2, 70, 13100, fs=SR, output="sos")  # low-pass, cutoff in Hz
    return signal.sosfilt(top_cut, rounded * live)


dry = scene()
out = record(dry)
digitize_waveform(out)
```